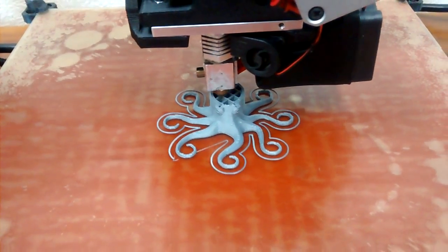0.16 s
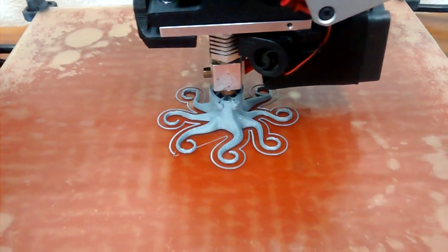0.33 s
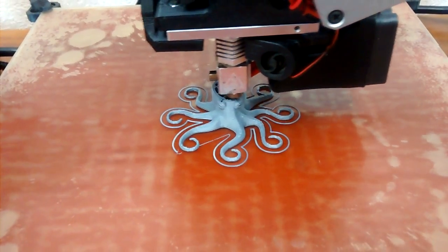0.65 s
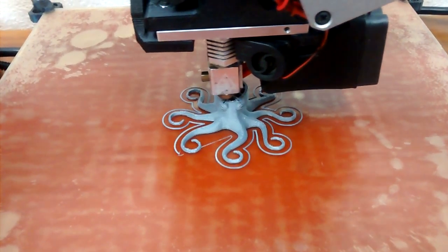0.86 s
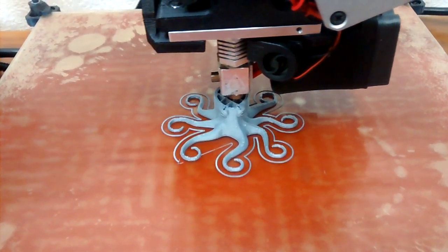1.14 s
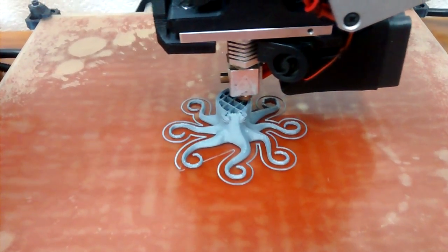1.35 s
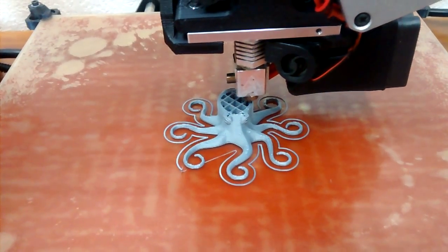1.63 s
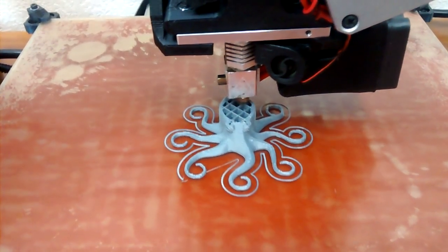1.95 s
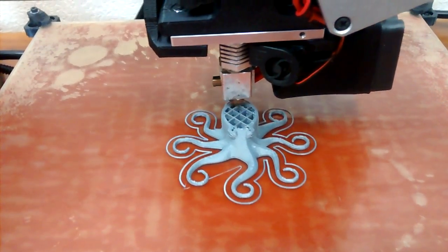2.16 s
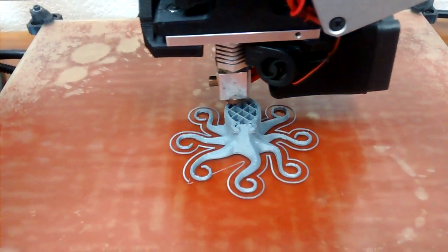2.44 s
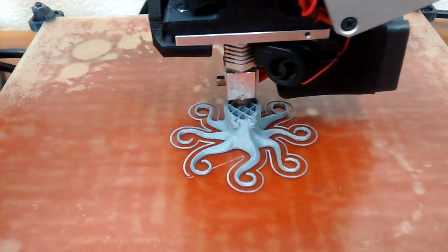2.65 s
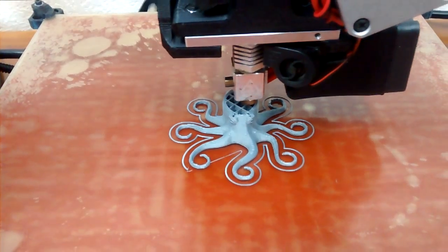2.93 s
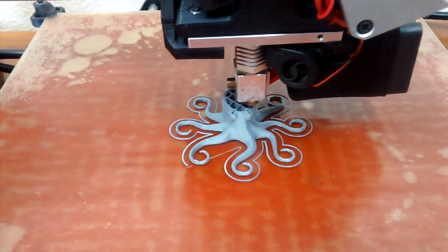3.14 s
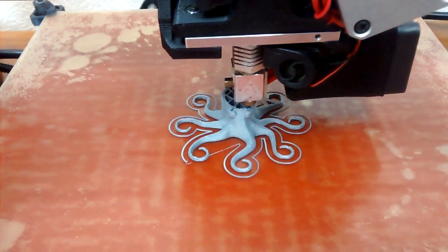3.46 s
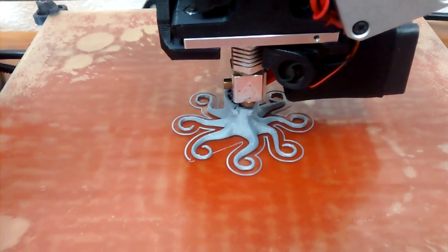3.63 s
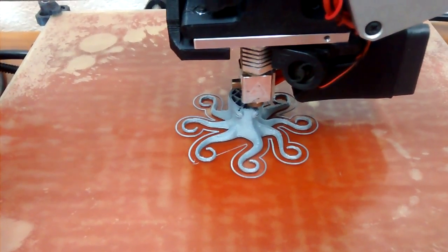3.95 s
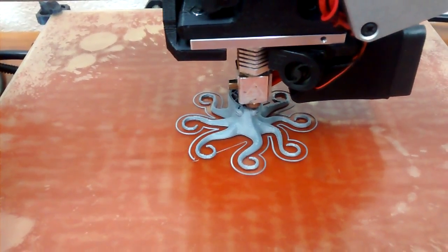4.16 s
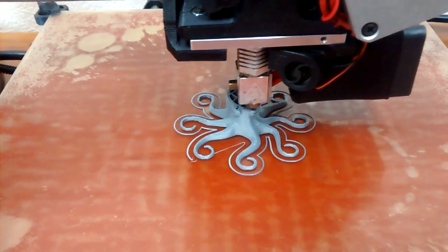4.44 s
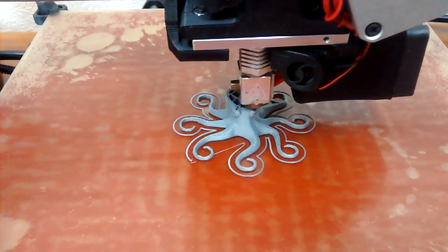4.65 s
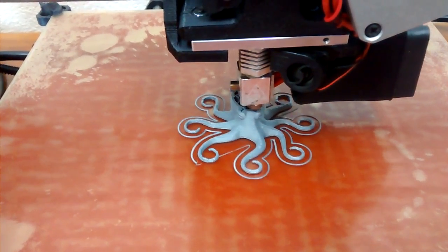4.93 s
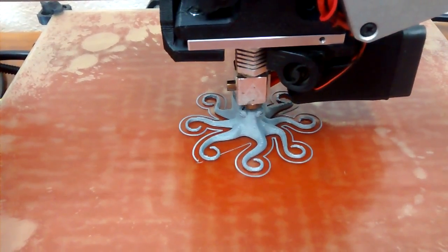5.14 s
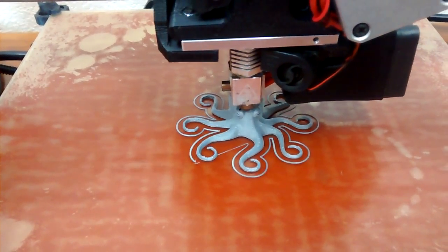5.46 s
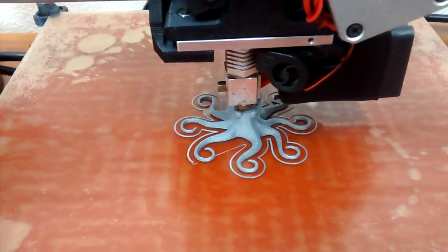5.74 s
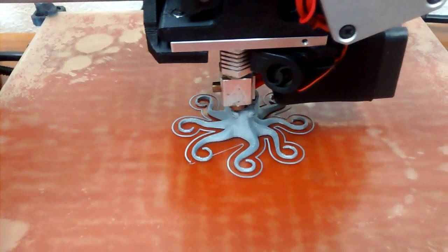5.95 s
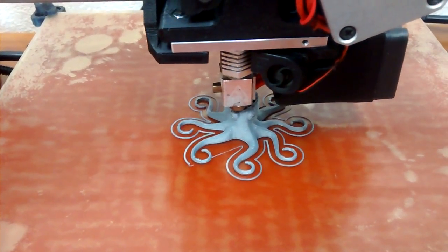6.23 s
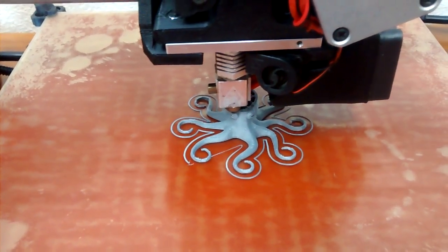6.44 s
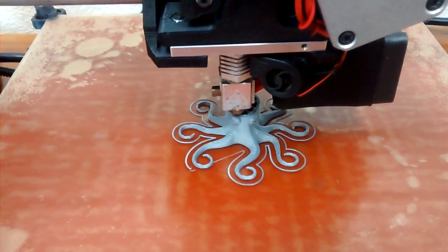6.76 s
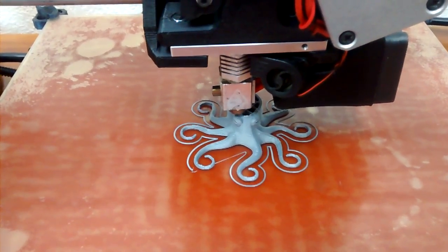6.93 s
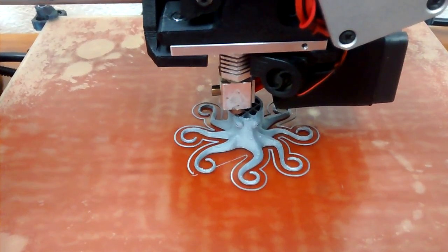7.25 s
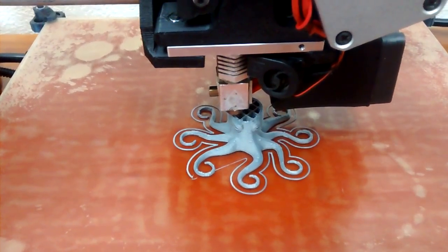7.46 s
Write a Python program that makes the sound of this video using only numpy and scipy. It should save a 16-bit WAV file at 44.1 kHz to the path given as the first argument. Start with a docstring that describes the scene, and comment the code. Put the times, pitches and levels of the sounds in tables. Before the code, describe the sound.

Cooling fans hum and hiss throughout as a small 3D printer runs near the microphone, louder on the right. Motor tones climb, hold and fall in several long strokes, with a low hum from the table beneath. About three seconds in, the strokes become short, quick and slightly lower, ending in brief chirps. Each change of direction brings a small shudder and rattle from the frame.

```python
"""At a table, close to a working desktop 3D printer, heard through a pair of microphone ports.
Stepper motors speed up, cruise and brake, so their step tones climb, hold and fall: long strokes round
the outline, then short ones for the filling. Linking moves chirp, a high hiss pulses, the table hums.
The frame lurches and rattles at the turns, and cooling fans hum steadily over their own hiss."""
import sys
import numpy as np
from scipy import signal
from scipy.fft import rfft, irfft, next_fast_len
from scipy.io import wavfile
from scipy.ndimage import uniform_filter1d

SR = 44100
rng = np.random.default_rng(int(sys.argv[2]) if len(sys.argv) > 2 else 0)


def output_pcm(signal):
    """Save a mono or channel-first signal as 16-bit PCM at the path in sys.argv[1].

    Samples are clipped to [-1, 1] before scaling.
    """
    pcm = np.clip(np.atleast_2d(signal).T, -1, 1) * 32767
    wavfile.write(sys.argv[1], SR, np.round(pcm).astype(np.int16))


N = 335160

# Fan blade and motor tones: (pitch [Hz], level [dB], rms waver [Hz])
FAN_TONE_LEVELS = [(744.2, -40.5, 1.006), (1513, -60, 1.64), (1962, -55.5, 0.87), (64, -73, 0.12)]
# Fan air: (frequency [Hz], relative density [dB])
FAN_AIR = [(30, -6), (130, -2.5), (175, -17), (260, -6.5), (350, -6.5), (440, -4.5), (550, -1.5), (680, -2),
           (850, -7), (1400, -5), (1750, -13.5), (2050, -11), (3200, -19), (7000, -17.5), (8200, -20),
           (12000, -25.5), (14500, -30)]
# Peaks and notches that colour the noises: (centre [Hz], width [Hz], relative gain [dB])
NOISE_PEAKS_AND_NOTCHES = [(229.9, 11.6, 12), (326, 34, 3.5), (456, 24, 11), (532.5, 32, 15),
                           (597.3, 44, 20), (851, 29, 7), (1050, 195, 10.5), (1386, 90, -5.5),
                           (2117, 12, 8), (2568, 32, 10), (4500, 48, -41), (5076, 107, 14), (5340, 65, -11),
                           (8000, 35, -44), (10260, 430, -24)]

# Long strokes round the outline; motor tone levels are taken before the frame colours them:
# (cruise start [s], cruise end [s], microstep tone [dB], overtones [dB], full-step push [dB],
# growl [dB], microstep tone's gain on the ramps [dB])
OUTLINE_STROKES = [(-0.1, 0.619, -43.5, -51.5, -46, -61, 4.5), (0.936, 1.546, -39, -56, -54.5, -57.5, -1.5),
                   (1.755, 2.233, -45.5, -51, -47, -73, 4), (2.483, 3.109, -44.5, -50.5, -51, -57, 2.5)]
# Short strokes of the filling: (cruise start [s], cruise end [s], microstep tone [dB], overtones [dB])
FILL_STROKES = [(3.2, 3.241, -42, -56), (3.339, 3.424, -43, -59), (3.552, 3.606, -42, -56.5),
                (3.709, 3.764, -41.5, -58), (3.887, 3.991, -41, -55.5), (4.097, 4.183, -42, -57),
                (4.283, 4.366, -40.5, -59), (4.467, 4.548, -43, -58), (4.646, 4.728, -41, -56),
                (4.823, 4.894, -44, -58), (5.092, 5.162, -43, -59), (5.268, 5.32, -40, -59),
                (5.44, 5.474, -41.5, -62), (5.576, 5.602, -40, -59), (5.709, 5.726, -41.5, -62),
                (5.825, 5.846, -40.5, -62), (5.949, 6.09, -43, -58), (6.189, 6.32, -41, -58),
                (6.429, 6.543, -43, -60), (6.643, 6.745, -40.5, -60), (6.85, 6.9, -41.5, -59)]
# Quick jumps that brake before full speed: (fastest moment [s], top microstep rate [Hz],
# acceleration [Hz/s], microstep tone [dB], overtones [dB], full-step push [dB], growl [dB])
JUMP_MOVES = [(.771, 6750, 53000, -48, -63, -60, -60), (1.649, 4050, 53000, -47.5, -56, -63, -60),
              (2.356, 4650, 53000, -49, -58, -55, -58), (4.985, 3600, 39000, -49, -57, -58, -56),
              (6.975, 3400, 45000, -49, -58, -60, -60), (7.088, 2000, 45000, -50, -58, -62, -60),
              (7.195, 2180, 45000, -47, -58, -62, -60), (7.305, 2180, 45000, -46, -60, -62, -60),
              (7.415, 2180, 45000, -46, -60, -62, -60), (7.516, 2150, 45000, -46, -60, -62, -60)]
# Links too short to cruise: (fastest moment [s], top microstep rate [Hz], microstep tone [dB])
LINK_MOVES = [(3.29, 1494, -42), (3.459, 1545, -44), (3.495, 1534, -46), (3.645, 1468, -41),
              (3.83, 1520, -44), (4.236, 1540, -53), (4.421, 1378, -47), (5.209, 1567, -50),
              (5.353, 1533, -50), (5.518, 1467, -45), (5.645, 1502, -47), (5.775, 1508, -45),
              (5.89, 1520, -44.5), (6.129, 1436, -51), (6.364, 1544, -48), (7.06, 1455, -46.5),
              (7.24, 1517, -48), (7.299, 1510, -51), (7.365, 1470, -46), (7.46, 1520, -46),
              (7.569, 1503, -46)]
# Overtones of the step tone: (multiple of the microstep rate [ratio], gain [dB])
STEP_OVERTONES = [(2, 4), (3, -4.5), (4, -6), (5, -4), (6, -1.5), (7, -7)]
# Motor growl: (multiple of the full-step rate [ratio], gain [dB])
GROWL_PARTIALS = [(2, 2), (3, 0.5), (4, -2), (5, -0.5), (6, -3.5), (14, -27), (15, 5.5), (17, 1.5)]
# How well the frame radiates a motor tone: (frequency [Hz], gain [dB])
FRAME_RESPONSE = [(180, -14.5), (280, 8.5), (370, -9.5), (480, 1.5), (850, -8.5), (1300, -2), (1563, -8.5),
                  (1800, -9), (2050, -1.5), (2600, 0), (3200, -13.5), (4000, -8), (4500, -12), (5050, -8),
                  (5500, -20), (6000, -3), (8000, -3), (10900, -18), (12000, -17), (14000, -14)]
# Parts of the frame that a passing tone sets ringing: (centre [Hz], width [Hz], gain [dB])
FRAME_MODES = [(442, 7.5, 5), (853, 22, 9.5), (1096, 16, 2), (1398, 69, 3), (2020, 50, -6), (2630, 70, -3),
               (4230, 37, -1), (5100, 65, 10)]
# Whistles during the outline: (start [s], end [s], level before the fade [dB])
WHISTLE_SWELLS = [(-0.05, 0.618, -54.5), (0.939, 1.544, -55), (1.892, 2.224, -55.5), (2.838, 3.11, -63)]
# High hiss: (frequency [Hz], relative density [dB])
HIGH_HISS_SPECTRUM = [(8000, -6), (10000, -9), (13000, -9.5), (14500, -2), (15500, -4)]

# Lurches of the frame as the carriage reverses: (strongest moment [s], rumble [dB])
LURCHES = [(0.02, -42.5), (0.63, -57), (0.86, -50), (1.65, -43), (0.905, -46), (1.725, -38.5),
           (2.29, -36.5), (2.4, -39.5), (2.47, -44), (3.17, -41), (3.32, -39), (3.49, -42), (3.58, -41),
           (3.68, -42), (3.83, -38), (4.04, -37), (4.25, -39), (4.42, -37.5), (4.51, -48), (4.64, -39.5),
           (4.8, -36.5), (4.93, -41), (5.06, -38.5), (5.25, -39), (5.42, -39), (5.52, -35), (5.69, -43),
           (5.79, -37.5), (5.9, -38), (6.16, -39.5), (6.39, -36.5), (6.65, -40), (6.85, -41), (6.981, -45),
           (7.15, -39.5), (7.28, -48), (7.39, -37), (7.49, -52), (7.58, -39)]
# Frame rumble: (frequency [Hz], relative density [dB])
RUMBLE_SPECTRUM = [(150, -16.5), (230, -5), (300, 6), (370, -10), (450, -0.5), (600, -15.5), (700, 5),
                   (900, 1), (1000, -9), (2000, -69)]
# Frame rattle: (frequency [Hz], relative density [dB])
RATTLE_SPECTRUM = [(700, -24), (850, 3.5), (1000, -11), (1400, 12.5), (1600, -4.5), (1800, -2.5), (2100, 3),
                   (2600, -7), (3300, -16.5), (5000, -19), (9000, -49), (15000, -60)]
# Brief notes at the turns: (middle [s], length [s], pitch [Hz], level [dB])
TURN_NOTES = [(0.72, 0.02, 4200, -59), (0.739, 0.022, 5050, -56), (0.801, 0.022, 5050, -56),
              (0.819, 0.02, 4200, -59), (4.26, 0.032, 467, -47), (4.63, 0.03, 543, -44),
              (5.52, 0.03, 471, -43), (6.4, 0.035, 468, -42), (3.33, 0.025, 545, -42),
              (0.77, 0.05, 282, -47), (0.86, 0.04, 280, -51), (0.91, 0.04, 493, -44),
              (1.58, 0.03, 836, -45), (2.46, 0.03, 843, -41), (3.54, 0.025, 854, -45),
              (4.03, 0.05, 280, -53), (4.43, 0.05, 300, -54), (4.92, 0.04, 490, -53),
              (4.93, 0.04, 287, -53), (5.2, 0.04, 290, -50), (5.26, 0.025, 840, -46),
              (5.42, 0.025, 862, -41), (5.66, 0.06, 284, -45), (5.69, 0.03, 524, -39.5),
              (6.62, 0.03, 480, -51), (7.04, 0.03, 542, -42.5), (7.04, 0.025, 850, -40),
              (7.29, 0.025, 840, -39), (7.39, 0.04, 844, -46), (0.655, 0.04, 797, -46),
              (1.645, 0.014, 3950, -54), (3.14, 0.035, 822, -38.5), (3.63, 0.025, 860, -42),
              (4.21, 0.027, 835, -40), (4.565, 0.025, 850, -39), (6.12, 0.025, 838, -38),
              (6.925, 0.023, 850, -41), (0.856, 0.015, 4200, -59), (1.686, 0.063, 2110, -46),
              (1.725, 0.0198, 475, -39), (1.739, 0.029, 870, -39), (2.276, 0.049, 845, -44),
              (2.305, 0.028, 2210, -43), (2.35, 0.074, 233, -48), (2.362, 0.025, 2040, -40),
              (2.371, 0.053, 448, -40), (2.408, 0.027, 2140, -45), (2.426, 0.053, 461, -43),
              (2.429, 0.017, 1350, -42), (2.463, 0.058, 452, -40), (3.177, 0.024, 464, -40),
              (3.321, 0.052, 457, -38), (3.326, 0.056, 274, -47), (3.475, 0.071, 282, -46),
              (3.485, 0.028, 2100, -48), (3.501, 0.093, 455, -36.5), (3.82, 0.024, 2090, -46),
              (3.825, 0.059, 437, -40.5), (4.02, 0.028, 883, -41), (4.232, 0.034, 1285, -42),
              (4.396, 0.027, 905, -39), (4.596, 0.027, 1240, -42), (4.625, 0.031, 450, -41.5),
              (4.758, 0.039, 851, -37), (4.915, 0.03, 880, -41), (5.06, 0.023, 458, -41),
              (5.07, 0.05, 848, -37), (5.348, 0.049, 851, -41), (5.377, 0.05, 264, -41.5),
              (5.413, 0.029, 447, -38), (5.46, 0.039, 286, -55), (5.53, 0.087, 284, -45),
              (5.539, 0.047, 558, -44), (5.634, 0.023, 848, -36), (5.775, 0.08, 297, -44.5),
              (5.8, 0.026, 458, -42), (5.897, 0.05, 295, -48), (5.905, 0.052, 485, -42),
              (5.943, 0.026, 848, -39), (6.165, 0.019, 525, -39), (6.394, 0.05, 290, -49),
              (6.571, 0.028, 850, -37), (6.77, 0.03, 830, -40), (7.01, 0.027, 2140, -44),
              (7.144, 0.06, 292, -43), (7.193, 0.02, 2070, -39), (7.306, 0.02, 2090, -44),
              (7.415, 0.022, 2100, -47), (7.515, 0.025, 1810, -46), (7.49, 0.055, 290, -42),
              (7.115, 0.025, 1450, -49), (7.14, 0.02, 1400, -47), (7.35, 0.02, 1450, -49),
              (7.568, 0.028, 1210, -49), (7.582, 0.073, 453, -44)]

# The right microphone port over the left: (frequency [Hz], gain [dB])
RIGHT_GAIN = [(30, 14), (70, 12), (140, 14.5), (300, 11.5), (500, 10), (1050, 3.5), (1380, 3.5),
              (1570, 10.5), (2300, 2.5), (3000, 8), (5000, 9), (6600, 2), (8800, 0.5), (10500, 5),
              (12000, 7), (15500, 11.5)]
# The right port ahead of the left: (frequency [Hz], phase lead [rad])
RIGHT_LEAD = [(0, -1.6), (500, -.9), (1200, .1), (2000, 2.5), (2450, 3.1), (4000, 6.3), (5300, 9.4),
              (6700, 12.5), (7500, 15.5), (8200, 15.9), (8350, 18.6), (9000, 18.9), (10100, 22.0),
              (15400, 34.5)]
# How alike the noise is at the two ports: (frequency [Hz], coherence [0-1])
PORT_COHERENCE = [(60, .45), (200, .3), (400, .75), (750, .95), (2400, .8), (3200, .5), (5500, .6),
                  (6600, .85), (7200, .45), (7600, .98), (8900, .95), (9500, .45), (11000, .35),
                  (14500, .6)]

MICROSTEPS = 16  # to a full step
OUTLINE_HZ, FILL_HZ = 1988, 1563  # microstep rates at cruise
PRINT_ACCEL, FILL_ACCEL = 40000, 38000  # change of microstep rate [Hz/s]
OUTLINE_END_S, FILL_END_S = OUTLINE_STROKES[-1][1], FILL_STROKES[-1][1]


def gain_of(db):
    """Decibels to amplitude."""
    return 10 ** (np.asarray(db) / 20)


def unit_rms(x):
    """Scales to rms 1."""
    return x / np.sqrt(np.mean(x ** 2) + 1e-20)


def curve_at(points, hz):
    """Reads a curve on a log-frequency axis."""
    f, value = np.transpose(points)
    return np.interp(np.log(hz + 1), np.log(f + 1), value)


def drift(top_hz, t, low=.05):
    """Random wander: sines from low x top_hz up to top_hz, rms 1."""
    coarse = np.append(t[::64], t[-1])
    rates = top_hz * np.geomspace(low, 1, num=16)
    waves = sum(np.sin(2 * np.pi * (f * coarse + rng.random())) / np.sqrt(f) for f in rates)
    return np.interp(t, coarse, unit_rms(waves))


def add(mix, start_s, sound):
    """Mixes a sound in, dropping what falls outside the mix."""
    at = round(start_s * SR)
    part = mix[max(at, 0):max(at + len(sound), 0)]
    part += sound[max(-at, 0):][:len(part)]


def to_right(hz):
    """Gain and phase lead of the right port against the left."""
    return gain_of(curve_at(RIGHT_GAIN, hz)) * np.exp(1j * np.interp(hz, *np.transpose(RIGHT_LEAD)))


def port_noise(spectrum, peak_share, patchy_db):
    """Noise coloured by a spectrum, peaks and notches, partly alike at the ports; the left has rms 1."""
    frames, hz = N // 1024 + 5, np.fft.rfftfreq(4096, 1 / SR)
    a, b, c, d, patches = rng.standard_normal((frames, len(hz), 5)).T
    patches = uniform_filter1d(patches, size=50, axis=0)  # neighbouring frequencies flicker together
    patches = unit_rms(uniform_filter1d(patches, size=2, axis=1))
    peaks_db = sum(db / (1 + (2 * (hz - f) / width) ** 2) for f, width, db in NOISE_PEAKS_AND_NOTCHES)
    colour_db = curve_at(spectrum, hz) + peak_share * peaks_db
    coherence = np.clip(curve_at(PORT_COHERENCE, hz), 0, 1)[:, None]
    left, unrelated = a + 1j * b, c + 1j * d
    right = to_right(hz)[:, None] * (coherence * left + np.sqrt(1 - coherence ** 2) * unrelated)
    spectra = np.array([left, right]) * gain_of(colour_db[:, None] + patchy_db * patches)
    pair = signal.istft(spectra, nperseg=4096, noverlap=3072)[1][:, :N]
    return pair / np.sqrt(np.mean(pair[0] ** 2))


def fan_tones(t):
    """The fans' blade and motor tones, wavering a little in pitch and level."""
    out = np.zeros(N)
    for hz, db, waver_hz in FAN_TONE_LEVELS:
        level = np.sqrt(2) * gain_of(db + .8 * drift(20, t, low=.22))
        cycles = np.cumsum(hz + waver_hz * drift(4.5, t)) / SR
        out += level * np.sin(2 * np.pi * (cycles + rng.random()))
    return out


def fan_hiss():
    """Air rushing steadily through the fans."""
    return gain_of(-44.5) * port_noise(FAN_AIR, peak_share=.42, patchy_db=2)


def stepper_move(start, end, top_hz, accel, step_db, overtone_db, push_db, growl_db,
                 smear_db, ramp_db, phases):
    """A motor speeds up, cruises from start to end, brakes. Gives onset, tones, push and coil load."""
    ramp_s = top_hz / accel
    t = np.arange(start - ramp_s, end + ramp_s, 1 / SR)
    hz = np.clip(top_hz + accel * np.minimum(t - start, end - t), 0, top_hz)
    ramping = np.clip(48 * (1 - hz / top_hz), 0, 1)
    # above printing speed the steps come unevenly and weaker
    racing = np.clip(hz / OUTLINE_HZ - 1, 0, 1) + 3 * np.clip(hz / 5300 - 1, 0, 1)
    steps = np.cumsum(hz * (1 + .02 * racing * drift(300, t, low=.45))) / SR
    full_step_angle = 2 * np.pi * steps / MICROSTEPS
    braking_db = 1.0 * (t > end)
    partials = [(1, step_db - 9 * racing + (ramp_db + braking_db) * ramping)]
    # uneven step timing on the ramps dulls the overtones; they throb with every second full step
    overtones_db = overtone_db + smear_db * ramping + .87 * np.cos(full_step_angle / 2)
    partials += [(k, overtones_db + db) for k, db in STEP_OVERTONES]
    partials += [(k / MICROSTEPS, growl_db + db) for k, db in GROWL_PARTIALS]
    tones = np.zeros(len(t))
    for (k, db), phase in zip(partials, phases):
        radiated = gain_of(db + curve_at(FRAME_RESPONSE, k * hz)) * (k * hz < SR / 2)
        tones += radiated * np.sin(2 * np.pi * (k * steps + phase))
    rasp_db = np.clip(hz / 700 - 1.5, .7, 3) * ramping * drift(220, t, low=.2)  # fast ramps are roughest
    tones *= gain_of(.9 * drift(40, t) + rasp_db)
    tones *= np.clip((hz - 300) / 390, 0, 1)  # silent near standstill
    push = gain_of(push_db) * np.sin(full_step_angle)
    pulsing = 1 + .27 * np.cos(full_step_angle / 2) + .4 * np.cos(full_step_angle)
    load = np.minimum(hz / OUTLINE_HZ, 1) ** 2.6 * pulsing
    return t[0], np.sqrt(2) * tones, np.sqrt(2) * push, load


def motors():
    """The steppers run through every move. Gives step tones, full-step push and coil load."""
    print_smear_db, jump_smear_db, ramp_db = -10, -3, 1  # overtones and step tone on the ramps
    push_db, growl_db, link_overtone_db = -68, -61.5, -69
    shared = push_db, growl_db, print_smear_db, ramp_db
    moves = [(start, end, OUTLINE_HZ, PRINT_ACCEL, *levels, print_smear_db, own_ramp_db)
             for start, end, *levels, own_ramp_db in OUTLINE_STROKES]
    moves += [(start, end, FILL_HZ, FILL_ACCEL, *levels, *shared) for start, end, *levels in FILL_STROKES]
    moves += [(s, s, *jump, jump_smear_db, ramp_db) for s, *jump in JUMP_MOVES]
    # on the slanting jumps after the outline a second motor runs along, slower and quieter
    moves += [(s, s, .84 * hz, .84 * accel, *np.subtract(levels, 5), jump_smear_db, ramp_db)
              for s, hz, accel, *levels in JUMP_MOVES if s > OUTLINE_END_S]
    moves += [(s, s, hz, PRINT_ACCEL, db, link_overtone_db, *shared) for s, hz, db in LINK_MOVES]
    tracks = np.zeros((3, N))
    for move, phases in zip(moves, rng.random((len(moves), 20))):
        onset, *parts = stepper_move(*move, phases)
        for track, part in zip(tracks, parts):
            add(track, onset, part)
    return tracks


def frame_ring(step_tones):
    """Parts of the frame ring as a motor tone passes their pitch."""
    return sum(gain_of(db) * signal.lfilter(*signal.iirpeak(hz, hz / width, SR), step_tones)
               for hz, width, db in FRAME_MODES)


def whistles(fade_db_per_s=20):
    """Two close whistles ride on the outline strokes; the upper one swells more slowly."""
    out = np.zeros(N)
    for start, end, db in WHISTLE_SWELLS:
        t = np.arange(0, end - start, 1 / SR)
        for hz, rise_s in (4936, .022), (5006, .182):
            gate = np.clip(np.minimum(t / rise_s, t[::-1] / .01), 0, 1)
            level_db = db - fade_db_per_s * np.maximum(t - rise_s, 0) + 1.7 * drift(18, t, low=.28)
            add(out, start, gate * gain_of(level_db) * np.sin(2 * np.pi * hz * t))
    return out


def table_hum(push, ring_hz=123.1, width_hz=1.48):
    """The full steps push the table top, which rings on."""
    return signal.lfilter(*signal.iirpeak(ring_hz, ring_hz / width_hz, SR), push)


def high_hiss(t, load):
    """High hiss that grows with speed and pulses with the full steps; its level flutters at random."""
    level = gain_of(-66.5 + 1.7 * drift(60, t, low=.3)) * (1.5 + load)
    return level * port_noise(HIGH_HISS_SPECTRUM, peak_share=0, patchy_db=1.2)


def frame_rumble(t, rise_s=.02, fall_s=.044):
    """The frame lurches over a steady rumble when the carriage reverses."""
    power = gain_of(np.where(t < OUTLINE_END_S, -50.5, -48.5)) ** 2
    for s, db in LURCHES:
        power += gain_of(db) ** 2 * np.exp(-2 * np.maximum((s - t) / rise_s, (t - s) / fall_s))
    return np.sqrt(power) * port_noise(RUMBLE_SPECTRUM, peak_share=1.2, patchy_db=.8)


def frame_rattle(t, cruise_db=-55, settle_s=.0045):
    """The frame rattles at the turns and calms while the head is at speed."""
    fast_spans = [row[:2] for row in OUTLINE_STROKES + FILL_STROKES]
    fast_spans += [(s - .5 * hz / accel, s + .5 * hz / accel) for s, hz, accel, *_ in JUMP_MOVES]
    at_speed = sum(1. * (start < t) * (t < end) for start, end in fast_spans).clip(0, 1)
    calm = uniform_filter1d(at_speed, size=int(settle_s * SR))
    turn_db = np.where(t < OUTLINE_END_S, -46., -45.)
    turn_db -= 1.5 * (t > FILL_END_S)  # the closing run of small moves rattles less
    level_db = turn_db + calm * (cruise_db - turn_db) + 1.2 * drift(30, t, low=.2)
    return gain_of(level_db) * port_noise(RATTLE_SPECTRUM, peak_share=1.2, patchy_db=1.5)


def low_throb(start=.053, end=.67, db=-56):
    """A throb at half the full-step rate during the first stroke."""
    out = np.zeros(N)
    t = np.arange(0, end - start, 1 / SR)
    tone = np.sin(np.pi * OUTLINE_HZ / MICROSTEPS * t)
    add(out, start, gain_of(db) * tone * signal.windows.tukey(len(t), .4))
    return out


def turn_notes():
    """Brief notes at the turns, mostly on the frame's own pitches; they rise faster than they die."""
    out = np.zeros(N)
    for middle, length, hz, db in TURN_NOTES:
        t = np.arange(0, length, 1 / SR)
        envelope = np.sin(np.pi * (t / t[-1]) ** .73).clip(0) ** .81
        tone = np.sin(2 * np.pi * (hz * t + rng.random()))
        add(out, middle - length / 2, np.sqrt(2) * gain_of(db) * envelope * tone)
    return out


def driver_zips(switching_hz=19600, width_hz=640):
    """On jumps, noisy sidebands drop from the motor driver's switching tone by up to the step rate."""
    out = np.zeros(N)
    for s, top_hz, accel, *_ in JUMP_MOVES:
        t = np.arange(-top_hz / accel, top_hz / accel, 1 / SR)
        hz = top_hz - accel * abs(t)
        for share in np.linspace(.55, 1, num=7):
            fuzz = unit_rms(uniform_filter1d(rng.standard_normal(len(t)), size=int(SR / width_hz)))
            sideband = np.sin(2 * np.pi * np.cumsum(switching_hz - share * hz) / SR)
            add(out, s + t[0], gain_of(-59) * hz / top_hz * fuzz * sideband)
    return out


def scene():
    """The printer from close by, louder at the right port, the table's hum most of all."""
    t = np.arange(N) / SR
    step_tones, push, load = motors()
    tones = step_tones + frame_ring(step_tones) + whistles() + turn_notes() + driver_zips() + fan_tones(t)
    hum = table_hum(push) + low_throb()
    left = tones + gain_of(-9) * hum
    size = next_fast_len(N + 512)
    right = irfft(rfft(tones + hum, size) * to_right(np.fft.rfftfreq(size, 1 / SR)), size)[:N]
    return np.array([left, right]) + frame_rumble(t) + frame_rattle(t) + high_hiss(t, load) + fan_hiss()


def record(dry):
    """Both microphone channels cut off steeply at 15.5 kHz."""
    lowpass = signal.firwin(1501, 15510, window=("kaiser", 9), fs=SR)
    return signal.oaconvolve(dry, lowpass[None], "same")


dry = scene()
out = record(dry)
output_pcm(out)
```